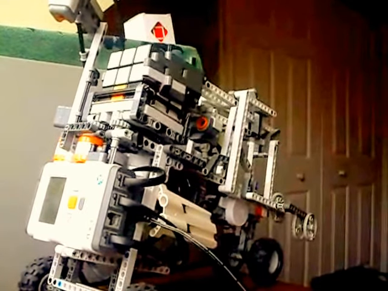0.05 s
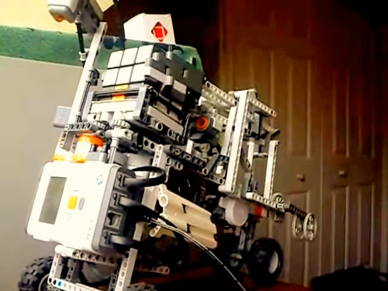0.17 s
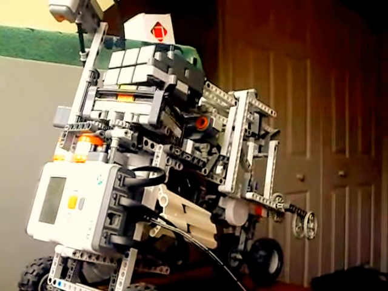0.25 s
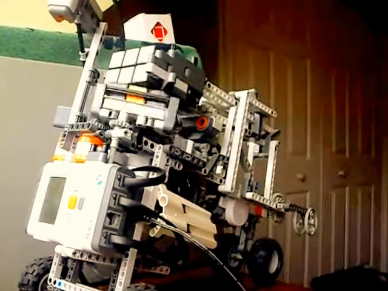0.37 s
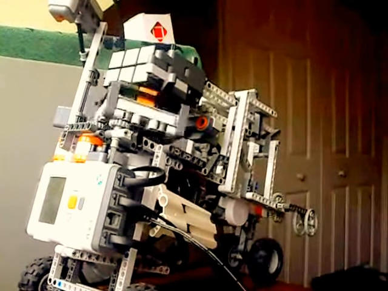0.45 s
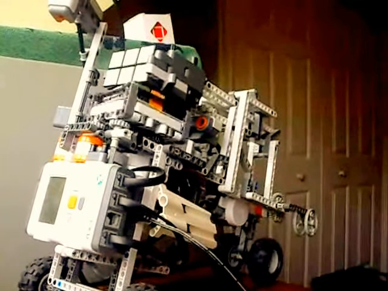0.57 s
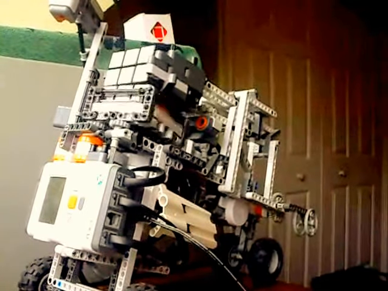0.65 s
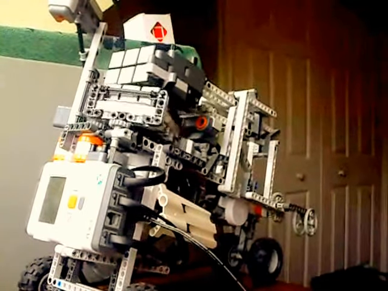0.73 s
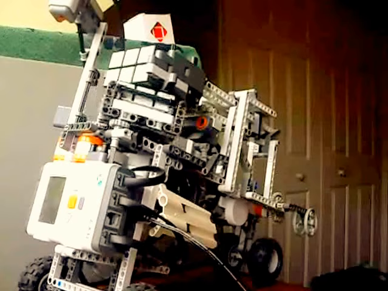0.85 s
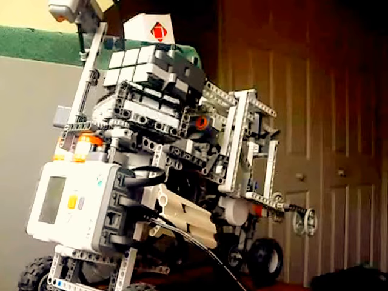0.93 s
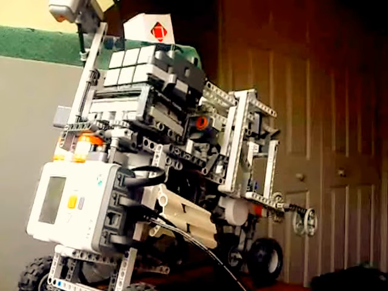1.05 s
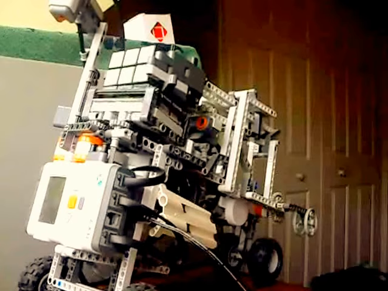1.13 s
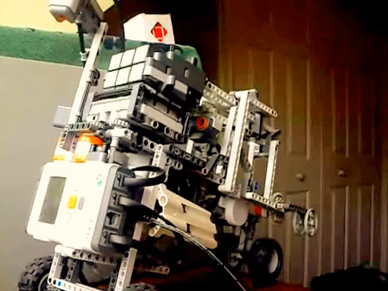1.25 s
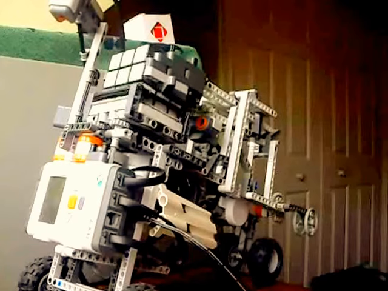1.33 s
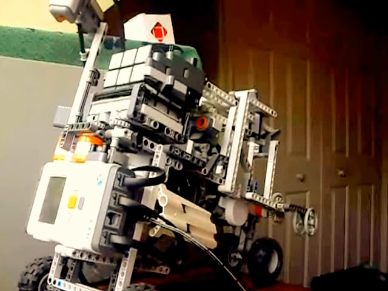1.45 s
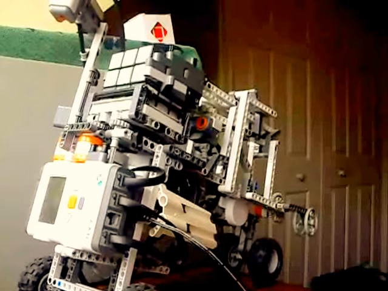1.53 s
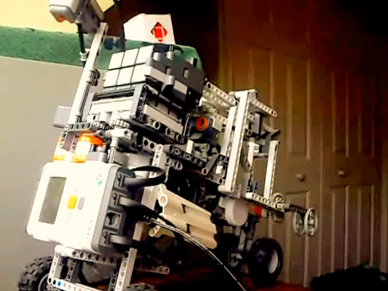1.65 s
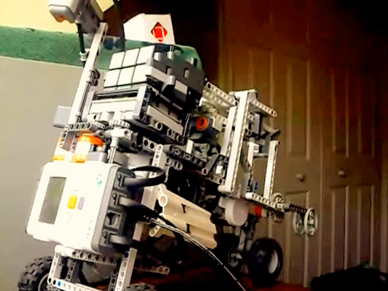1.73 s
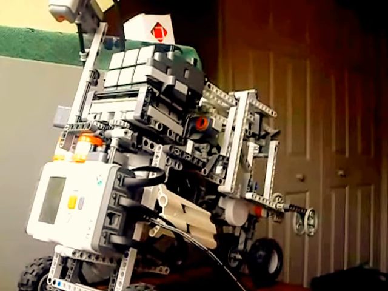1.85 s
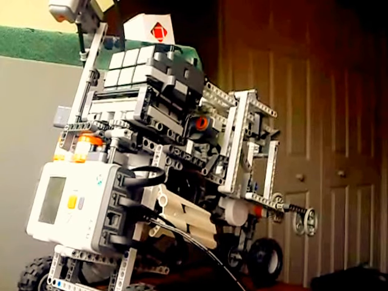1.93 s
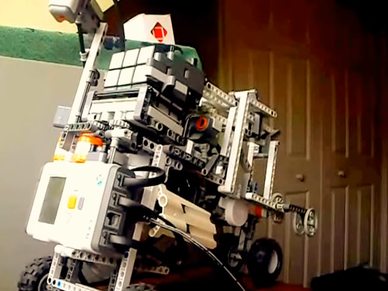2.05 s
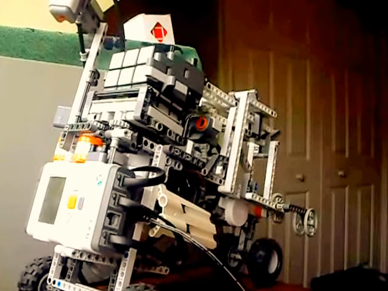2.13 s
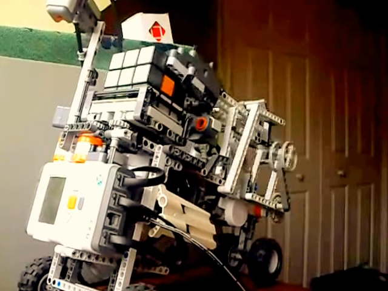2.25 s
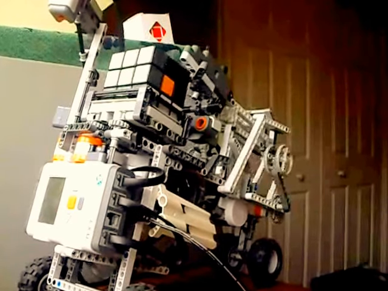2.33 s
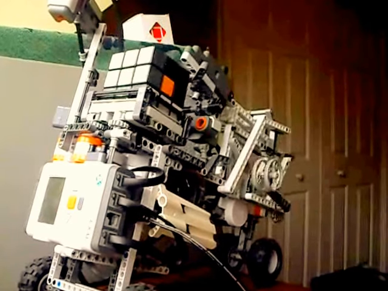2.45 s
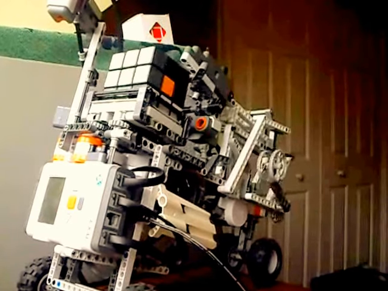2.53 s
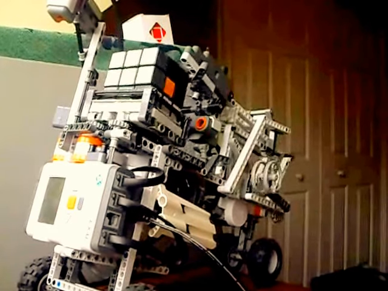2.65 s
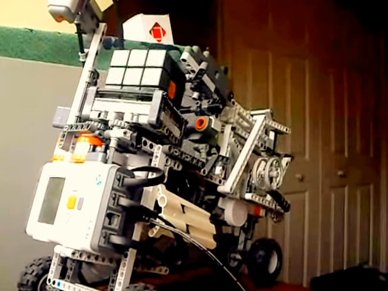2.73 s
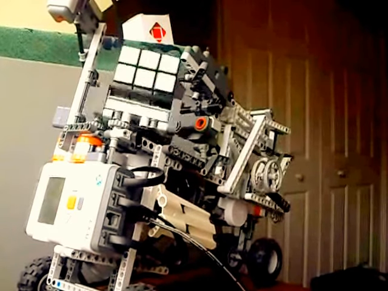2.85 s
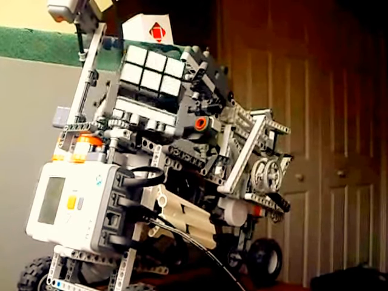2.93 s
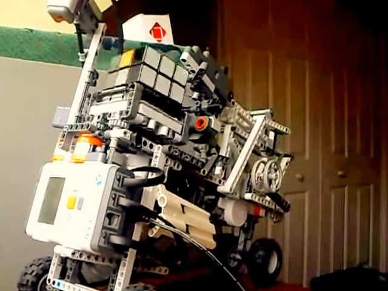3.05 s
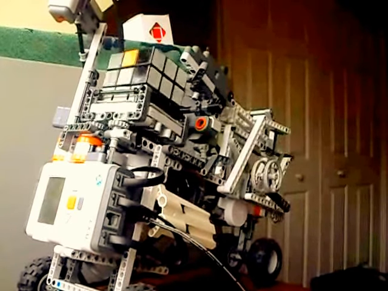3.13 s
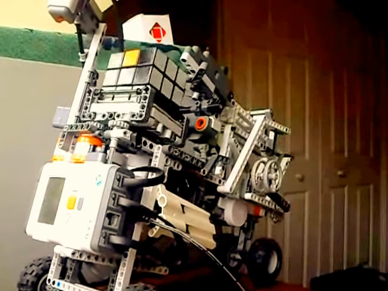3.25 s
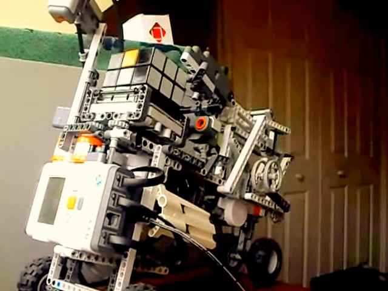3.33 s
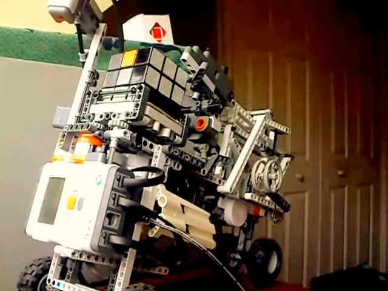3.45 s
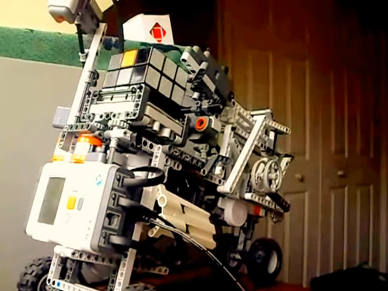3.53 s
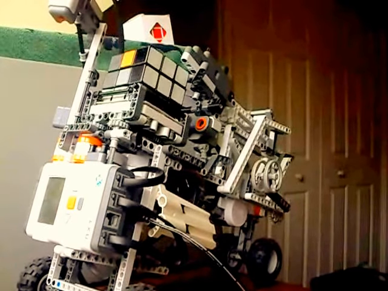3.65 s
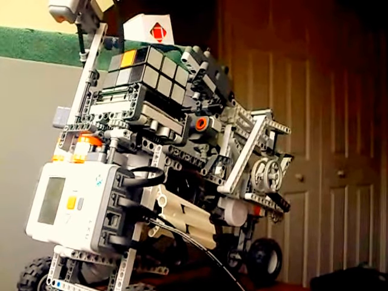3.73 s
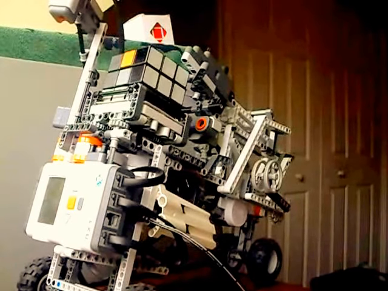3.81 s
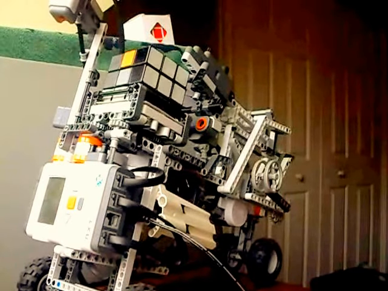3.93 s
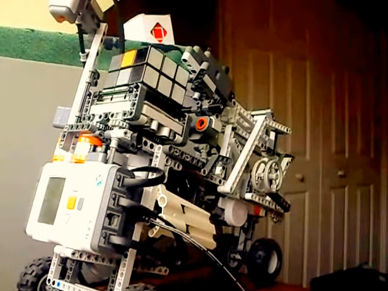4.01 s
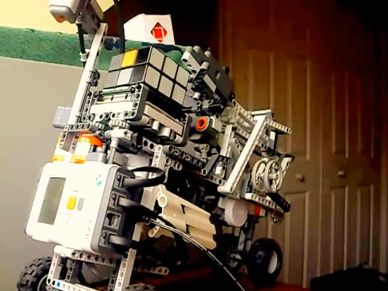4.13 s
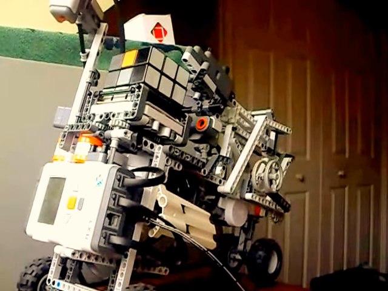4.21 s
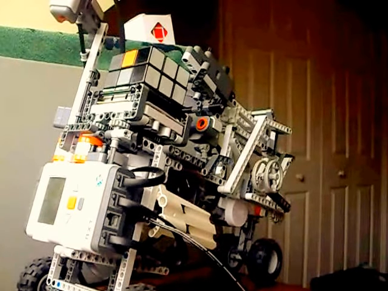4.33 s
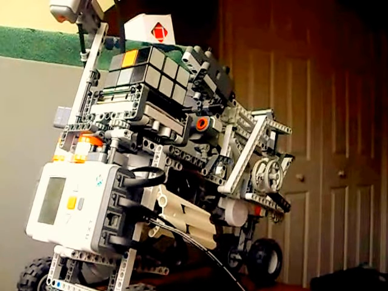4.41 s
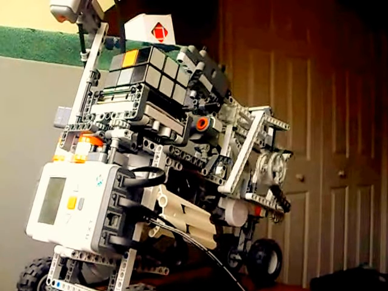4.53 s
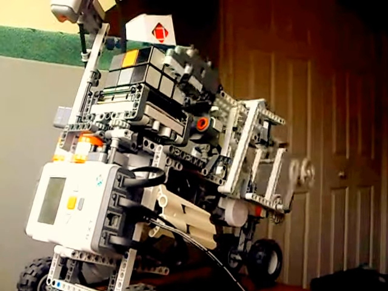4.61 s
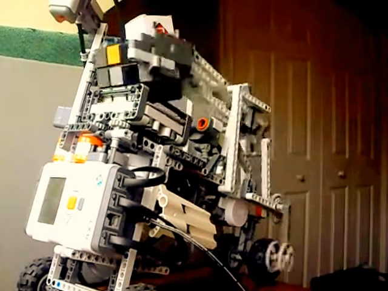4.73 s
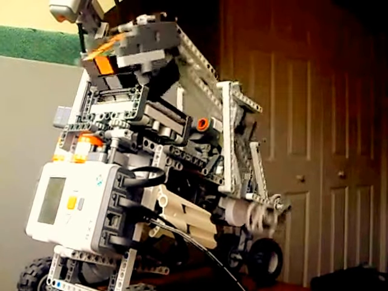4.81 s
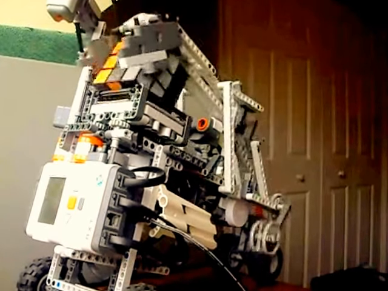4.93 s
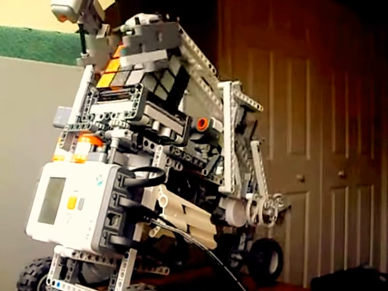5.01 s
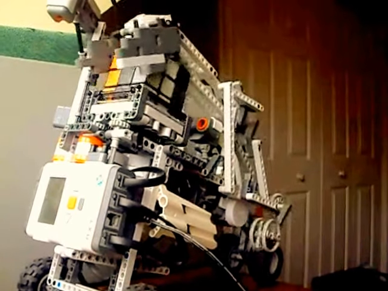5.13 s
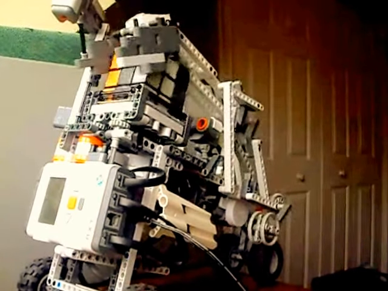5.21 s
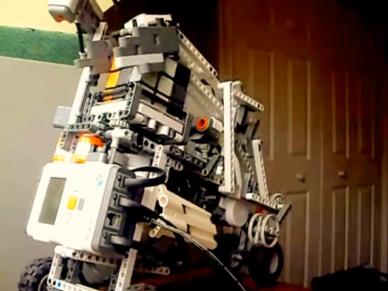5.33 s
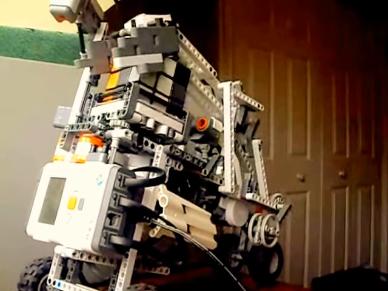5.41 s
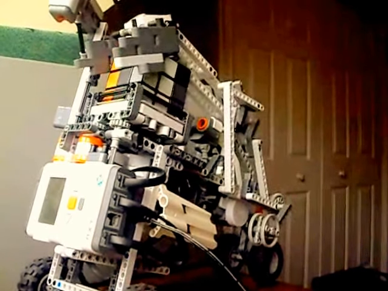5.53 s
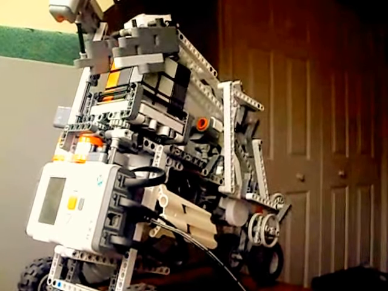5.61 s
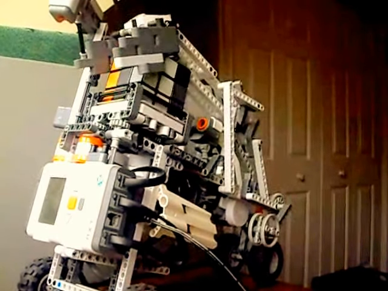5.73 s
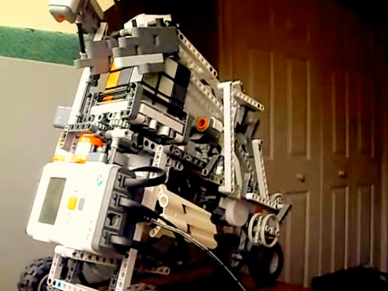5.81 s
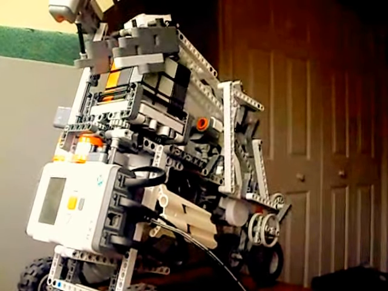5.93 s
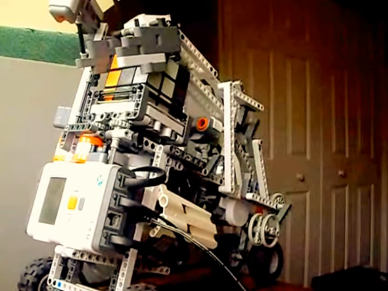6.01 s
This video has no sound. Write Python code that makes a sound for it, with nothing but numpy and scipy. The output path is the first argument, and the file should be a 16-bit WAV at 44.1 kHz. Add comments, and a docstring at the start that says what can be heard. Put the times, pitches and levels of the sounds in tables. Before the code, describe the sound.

Whining, rattling little motor bursts alternate with sharp plastic clicks and scrapes from a toy robot handling a puzzle cube in a small room.

```python
"""Toy robot and puzzle cube

A geared servo spins a toy-brick robot's turntable twice and nudges it into place. Tooth impacts make
it rattle, periodic meshing makes it whine, and the gears tick as they take up their play. The frame
clunks under load. A plastic arm knocks, slides and squeaks by stick-slip friction as it tips the cube
over. A small room reflects these sounds, above a low rumble."""
import sys
import numpy as np
from scipy import signal
from scipy.fft import rfft, irfft
from scipy.io import wavfile
from scipy.ndimage import uniform_filter1d

SR = 44100
rng = np.random.default_rng(int(sys.argv[2]) if len(sys.argv) > 2 else 0)


def put_to_file(sound):
    """Save the sound as 16-bit audio at rate SR, in the file named by the first command-line argument."""
    columns = np.atleast_2d(sound).T  # one column per channel
    safe = np.clip(columns, -1, 1)
    whole_steps = np.round(safe * 32767)
    wavfile.write(sys.argv[1], SR, whole_steps.astype(np.int16))


N = 267246
TIME = np.arange(N) / SR

# brief servo moves: start_s, length_s, rattle_db, ring_over_rattle_db, tick_db
SERVO_NUDGES = [(0.017, .03, -68, -8, -42.5), (1.1879, 0.17, -38.5, -7, -31), (1.4122, 0.15, -48, -1, -39),
                (1.7115, .09, -43, 2, -34), (3.271, .17, -48.5, -6.5, -37), (3.598, 0.1306, -53.5, -8, -46),
                (3.79, 0.12, -64.5, -1, -41.5), (3.938, 0.034, -66.5, -4, -45),
                (4.0406, 0.092, -51.5, -0.5, -42), (4.2189, 0.058, -65, -7, -36.5),
                (4.353, .03, -67.5, -4, -43.5), (4.79, 0.084, -39.5, -13, -39.5),
                (5.295, .14, -42, -3.5, -59), (5.476, .132, -42.5, 1, -33), (5.635, .06, -57, -5, -39),
                (5.793, 0.107, -58, 0.5, -37), (5.974, 0.1076, -38.5, 1.5, -39)]
# long servo moves: start_s, driven_s, top_rev_per_s, level_db, swell_db_per_s, attack_s, coast_s, tick_db
SERVO_TURNS = [(.157, .968, 98.4, -34.5, -1, 0.073, 0.0424, -45),
               (2.658, 0.47, 94, -39, 7, 0.028, 0.0868, -31)]
# broad spectrum of the gearbox: frequency_hz, level_db
GEARBOX_SPECTRUM = [(500, -23.5), (1200, -18.5), (1450, -4.5), (1850, 0), (2300, -6.5), (3700, -1),
                    (5300, -1.5), (6300, -2.5), (8700, -10.5), (11500, -13.5), (12700, -15.5),
                    (14000, -13.5), (15500, -19)]
# narrow resonances of the gearbox: centre_hz, width_hz, gain_db
GEARBOX_RESONANCES = [(1430, 90, 4.5), (2913, 320, 5), (3430, 53, -0.5), (6210, 160, 5), (7370, 180, 5.5),
                      (8000, 430, 5), (9360, 230, 5.5), (10340, 220, 5), (11670, 250, 6), (13900, 500, 1.5)]
# the arm meets the cube: start_s, knock_db, ring_hz, scrape_db, pressure_rise_s
ARM_CONTACTS = [(1.682, -37.5, 3350, -57, 0.013), (1.9, -40, 4600, -58, .009),
                (1.958, -33, 4930, -48.5, 0.011), (2.174, -48, 5850, -45.5, 0.033),
                (2.29, -42, 5850, -49.5, 0.041), (2.389, -35.5, 5830, -49, 0.0111),
                (4.516, -33, 5850, -45.5, 0.031), (4.603, -48, 4600, -46.5, 0.078),
                (4.709, -19.5, 5950, -36.5, 0.016), (4.884, -29.5, 4130, -41.5, .015),
                (4.946, -37, 3980, -45, .009), (5.06, -34.5, 5700, -57, 0.02),
                (5.155, -35, 2800, -47, 0.0073), (5.17, -22, 3060, -43, 0.017)]
# spectrum of plastic pressed hard: frequency_hz, level_db
HARD_RUB_SPECTRUM = [(600, -30), (1100, -12), (1700, 2.5), (2300, -1.5), (3100, 0.5), (4500, 0),
                     (6000, 0.5), (8000, -2.5), (10500, -6.5), (15000, -19.5)]
CASING_HZ = 4557


def from_db(db):
    """Amplitude ratio of a level in decibels."""
    return 10 ** (np.asarray(db) / 20)


def rms_one(x):
    """Normalisation to unit power."""
    return x / np.sqrt(np.mean(x ** 2) + 1e-20)


def drift(rate_hz, step=20):
    """Low-passed noise: a slow random fluctuation of unit power."""
    pole = np.exp(-2 * np.pi * rate_hz * step / SR)
    noise = rng.standard_normal((N + SR) // step)
    slow = signal.lfilter([1], [1, -2 * pole, pole ** 2], noise)[SR // step:]
    return np.interp(np.arange(N) / step, np.arange(len(slow)), rms_one(slow))


def response_db(spectrum, hz, modes=()):
    """Frequency response: a broad spectrum plus Lorentzian resonance peaks."""
    points = np.array(spectrum)
    db = np.interp(np.log(hz + 1), np.log(points[:, 0]), points[:, 1])
    return db + sum(peak_db / (1 + (2 * (hz - centre) / width) ** 2) for centre, width, peak_db in modes)


def colour(x, spectrum, modes=(), size=4096):
    """Minimum-phase filtering by a spectrum and its resonances; unit power."""
    db = response_db(spectrum, np.arange(size // 2 + 1) * SR / size, modes)
    cepstrum = irfft(np.log(from_db(db)))[:size // 2]
    impulse_response = irfft(np.exp(2 * rfft(cepstrum, size)))
    return rms_one(signal.oaconvolve(x, impulse_response)[:len(x)])


def resonance(x, hz, width_hz, order=2):
    """Band-pass resonator whose skirts steepen with order; unit power."""
    band = signal.butter(1, [hz - width_hz / 2, hz + width_hz / 2], "band", fs=SR, output="sos")
    return rms_one(signal.sosfilt(np.tile(band, (order, 1)), x))


def grains(per_s, spread_db):
    """Poisson process of tiny impacts, uneven in size and sign."""
    out = np.zeros(N)
    chance, size = rng.random((2, N))
    hit = chance < per_s / SR
    polarity = np.sign(chance[hit] - per_s / SR / 2)
    out[hit] = polarity * from_db(spread_db * np.minimum(-np.log(size[hit]), 4))
    return rms_one(out)


def decay(t60, size):
    """Exponential damping: 60 dB down in t60 seconds."""
    return np.exp(-np.log(1000) * np.arange(size) / SR / max(t60, 1e-3))


def add(out, start_s, sound):
    """Superposition of a short sound at its onset."""
    start = max(round(start_s * SR), 0)
    out[start:start + len(sound)] += sound[:N - start]


def rumble(level_db=-46):
    """Stationary room noise: a low rumble with faint hiss."""
    # background spectrum: frequency_hz, level_db
    spectrum = [(12, -8.5), (28, 2), (55, -3), (130, -7), (200, -10), (400, -15), (630, -19), (1000, -24),
                (2000, -30), (3200, -33), (6000, -37), (15500, -42.5)]
    return from_db(level_db) * colour(rng.standard_normal(N), spectrum)


def nudges(creep=0.21):
    """Aperiodic tooth impacts: in a brief move the teeth meet softly and the rotor holds no pitch."""
    # gearbox spectrum at low speed: frequency_hz, level_db
    slow_spectrum = [(500, -37), (1150, -9.5), (1430, 1), (1750, 3.5), (2300, -4), (3000, 0.5), (3800, 0.5),
                     (5300, -2.5), (6300, -3), (8500, -10.5), (11000, -13.5), (12700, -21), (15500, -15)]
    rattle_gain, ring_gain = np.zeros(N), np.zeros(N)
    for start, length, db, ring_db, _ in SERVO_NUDGES:
        arch = np.sin(np.pi * TIME[TIME < length] / length) ** 2
        swell = from_db(db) * (creep + (1 - creep) * arch)
        add(rattle_gain, start, swell)
        add(ring_gain, start, swell * from_db(ring_db))
    teeth = grains(per_s=4000, spread_db=3.1)
    rattle = colour(teeth, slow_spectrum, GEARBOX_RESONANCES)
    ring = resonance(teeth, CASING_HZ, width_hz=760)
    return rattle_gain * rattle + ring_gain * ring


def ticks(level_db=2.5, snap_db=-7.5, t60=0.011, take_up_s=.026, size=2048):
    """Backlash: as a move begins, a tooth crosses its gap and strikes the next; the casing rings."""
    out = np.zeros(N)
    moves = [(start + take_up_s, db) for start, *_, db in SERVO_TURNS]
    moves += [(start, db) for start, *_, db in SERVO_NUDGES]
    noise = rng.standard_normal(size * len(moves))
    snaps = colour(noise, GEARBOX_SPECTRUM, GEARBOX_RESONANCES).reshape(-1, size)
    ring = np.sin(2 * np.pi * CASING_HZ * TIME[:size])
    for (start, db), snap in zip(moves, snaps):
        add(out, start, from_db(db + level_db) * (ring + from_db(snap_db) * snap) * decay(t60, size))
    return out


def rotor(start, driven, top, attack, coast, speed_gap=.6, spin_up_s=.098, braking=0.27):
    """Inertia: the rotor nears top speed exponentially, then slows and fades once undriven."""
    on = (TIME > start) & (TIME < start + driven + 3 * coast)
    age = TIME[on] - start
    coasting = np.maximum(age - driven, 0) / coast
    speed = top * (1 - speed_gap * np.exp(-age / spin_up_s)) * np.exp(-braking * coasting)
    gain = (1 - np.exp(-age / attack)) * from_db(-10 * coasting ** 1.9)
    return on, age, speed, gain


def mesh_whine(on, rev_per_s, revs, waver_db=3.0):
    """Periodic meshing: harmonics of the rotation rate waver separately and excite the gearbox modes."""
    # gear mesh tones: rotor_multiple, level_db
    mesh_tones = [(10, 0), (15, -32), (16, -13), (17, -18), (19, -10.5), (20, 0.5), (26, -10.5), (30, -13),
                  (36, -8.5), (38, -10), (56, -8), (64, -8), (73, -6)]
    waver = waver_db * drift(23)
    # torque: louder while speeding up, softer while coasting, the low tones most
    acceleration = uniform_filter1d(np.gradient(rev_per_s) * SR, SR // 30)
    torque_db = np.clip(.045 * acceleration, -9, 8)
    whine = 0
    for multiple, db in mesh_tones:
        gearbox_db = response_db(GEARBOX_SPECTRUM, multiple * rev_per_s, GEARBOX_RESONANCES)
        tone_db = db + torque_db * min(1, 20 / multiple) + gearbox_db
        tone_db += np.roll(waver, rng.integers(N))[on]
        whine += from_db(tone_db) * np.cos(2 * np.pi * multiple * revs)
    return whine


def turn(move, repeat, throb_db, whine_db, growl_db, ring_db, ring_exponent, wobble, uneven_db):
    """Forced vibration: tooth flaws recurring each revolution and loose chatter shake gears and casing."""
    start, driven, top, level_db, swell_db_per_s, attack, coast, _ = move
    on, age, speed, gain = rotor(start, driven, top, attack, coast)
    rev_per_s = speed * (1 + wobble * drift(15.25)[on])
    revs = np.cumsum(rev_per_s) / SR
    flaws = irfft(np.exp(2j * np.pi * rng.random(170)), 4096)
    periodic = rms_one(np.interp(revs % 1, np.arange(len(flaws)) / len(flaws), flaws))
    chatter = grains(per_s=6000, spread_db=2.3)[on]
    # the teeth settle into their pattern as the rotor nears full speed
    share = np.clip(repeat * (rev_per_s / rev_per_s.max()) ** 2, 0, 1)
    teeth = np.sqrt(share) * periodic + np.sqrt(1 - share) * chatter
    # the off-centre rotor presses the teeth together once a revolution, with a lesser push between
    push = np.cos(2 * np.pi * revs) + 0.23 * np.cos(4 * np.pi * revs)
    pressure_db = throb_db * (speed / top) ** 2 * push + uneven_db * drift(60)[on]
    rattle = colour(teeth * from_db(pressure_db / 4), GEARBOX_SPECTRUM, GEARBOX_RESONANCES)
    ring = resonance(teeth * from_db(pressure_db), CASING_HZ, width_hz=576)
    growl = resonance(teeth, hz=1810, width_hz=1500)
    whine = mesh_whine(on, rev_per_s, revs)
    gears = from_db(swell_db_per_s * age) * (rattle + from_db(growl_db) * growl + from_db(whine_db) * whine)
    casing = from_db(ring_db) * (speed / top) ** ring_exponent * ring
    out = np.zeros(N)
    out[on] = from_db(level_db) * gain * (gears + casing)
    return out


def clunks(size=8192):
    """Damped free vibration: a soft jolt under load excites one low mode of the frame."""
    # jolts of the frame: start_s, level_db, pitch_hz, t60_s
    jolts = [(0.37, -41, 620, 0.057), (6.015, -42.5, 528, 0.24)]
    out = np.zeros(N)
    onset = 1 - decay(0.011, size)
    for start, db, hz, t60 in jolts:
        add(out, start, from_db(db) * np.sin(2 * np.pi * hz * TIME[:size]) * decay(t60, size) * onset)
    return out


def knocks(level_db=-6, rattle_db=-10, size=8192):
    """Impact of plastic on plastic: a sharp resonant crack, then loose pieces rattle out."""
    out = np.zeros(N)
    plastic = colour(grains(per_s=9000, spread_db=2.8), HARD_RUB_SPECTRUM)
    envelope = decay(0.01, size) + from_db(rattle_db) * decay(0.04, size)
    for k, (start, db, ring_hz, _, _) in enumerate(ARM_CONTACTS):
        contact = plastic[k * size:(k + 1) * size]
        body = contact + resonance(contact, ring_hz, width_hz=900, order=1)
        add(out, start, from_db(db + level_db) * rms_one(body) * envelope)
    return out


def slides(level_db=-1, hard_db=-44, steepness=1.33, size=16384):
    """Sliding friction: dense slips follow each knock; pressure brings out the frame's lower body."""
    # spectrum of plastic rubbed lightly: frequency_hz, level_db
    light_spectrum = [(590, -33), (1000, -7), (1320, -14), (1710, -3.5), (2560, -9), (2940, -6), (4860, -3),
                      (5980, 1.5), (7430, -13.5), (10400, -14.5), (15500, -26)]
    power = np.zeros(N)
    for start, _, _, db, rise_s in ARM_CONTACTS:
        progress = TIME[:size] / rise_s
        pressure = (progress * np.exp(1 - progress)) ** steepness
        add(power, start, (from_db(db) * pressure) ** 2)
    hard_share = power / (power + from_db(hard_db) ** 2)
    light_rub = colour(grains(per_s=2000, spread_db=3.4), light_spectrum)
    hard_rub = colour(grains(per_s=2500, spread_db=2.5), HARD_RUB_SPECTRUM)
    rub = np.sqrt(1 - hard_share) * light_rub + np.sqrt(hard_share) * hard_rub
    return from_db(level_db) * np.sqrt(power) * rub


def squeaks(level_db=-1, waver=0.0135, sag=.025, size=8192):
    """Stick-slip oscillation: a dry joint chirps, sagging in pitch as it slows."""
    # chirps of the joint: start_s, level_db, pitch_hz, t60_s
    chirps = [(3.925, -46.5, 8340, 0.041), (4.277, -43, 8350, 0.095), (4.9716, -44.5, 8200, 0.087)]
    out = np.zeros(N)
    unsteady = drift(120)
    onset = 1 - decay(0.0083, size)
    for k, (start, db, hz, t60) in enumerate(chirps):
        pitch_hz = hz * (1 + waver * unsteady[k * size:(k + 1) * size] + sag * (decay(0.075, size) - .5))
        tone = np.sin(2 * np.pi * np.cumsum(pitch_hz) / SR)
        add(out, start, from_db(db + level_db) * tone * decay(t60, size) * onset)
    return out


def room(x, wet_db=-20, t60=0.26, tail_cutoff_hz=6500, size=16384):
    """Comb filtering by early reflections gives a hollow colour; reverberation adds a short tail."""
    # reflections from the table and the nearest wall: delay_s, level_db
    reflections = [(.0031, -16.5), (.00665, -14)]
    lowpass = signal.butter(2, tail_cutoff_hz, fs=SR, output="sos")
    tail = signal.sosfilt(lowpass, rng.standard_normal(size)) * decay(t60, size) * (TIME[:size] > .005)
    response = from_db(wet_db) * tail / np.linalg.norm(tail)
    response[0] = 1  # direct sound
    for delay_s, db in reflections:
        response[round(delay_s * SR)] += from_db(db)
    return signal.fftconvolve(x, response / np.linalg.norm(response))[:N]


def scene():
    """Superposition in the room: a free, singing turn, a rougher one under load, and the small moves."""
    free = turn(SERVO_TURNS[0], repeat=0.48, throb_db=3.0, whine_db=-6.5, growl_db=-22.5,
                ring_db=3.5, ring_exponent=0.82, wobble=0.00244, uneven_db=-0.5)
    loaded = turn(SERVO_TURNS[1], repeat=0.39, throb_db=1, whine_db=-16, growl_db=-15,
                  ring_db=1.5, ring_exponent=0.166, wobble=.016, uneven_db=2.5)
    robot = free + loaded + nudges() + ticks() + clunks() + knocks() + slides() + squeaks()
    return (rumble() + room(robot))[None]


def record(dry, cutoff_hz=15530):
    """Band limiting: a steep elliptic low-pass removes the highest treble."""
    return signal.sosfilt(signal.ellip(12, .1, 80, cutoff_hz, fs=SR, output="sos"), dry)


dry = scene()
out = record(dry)
put_to_file(out)
```